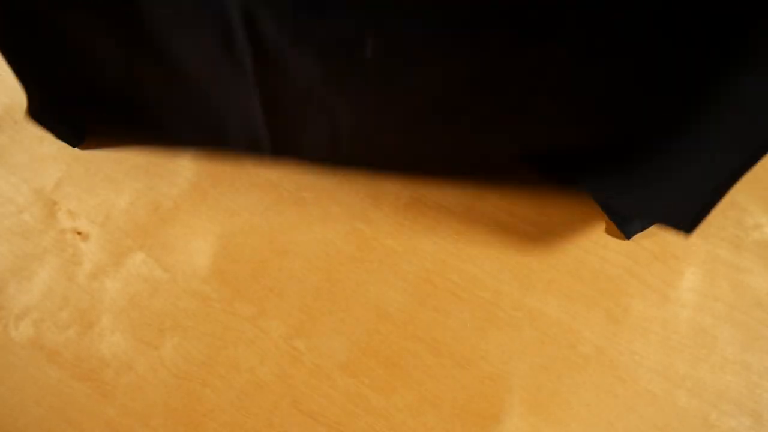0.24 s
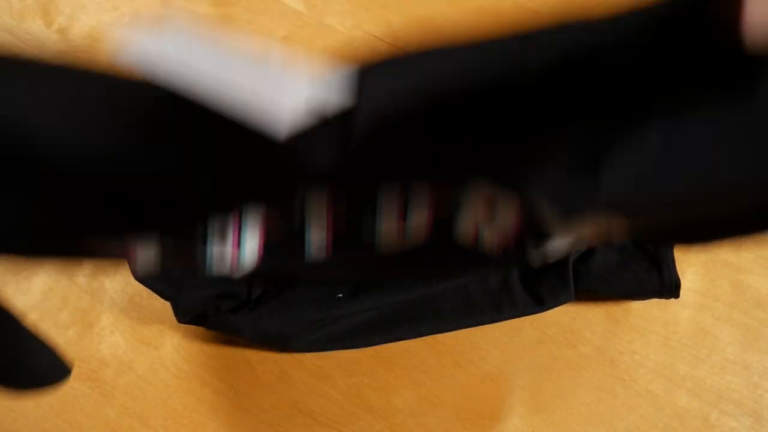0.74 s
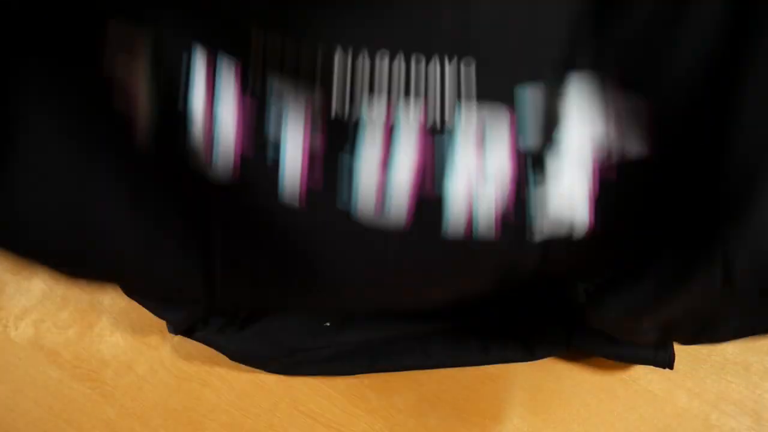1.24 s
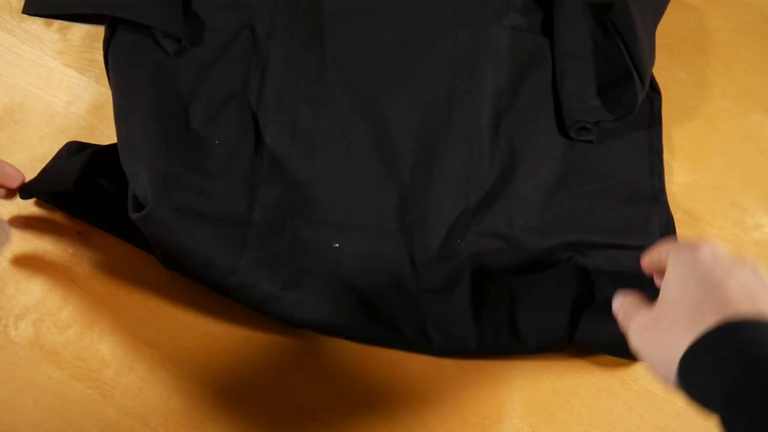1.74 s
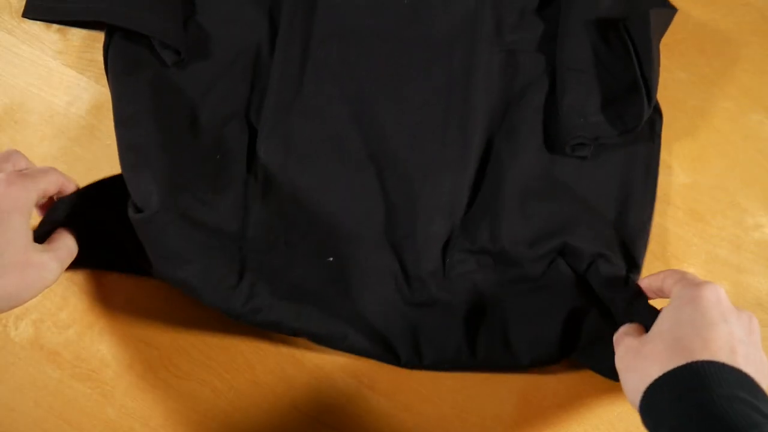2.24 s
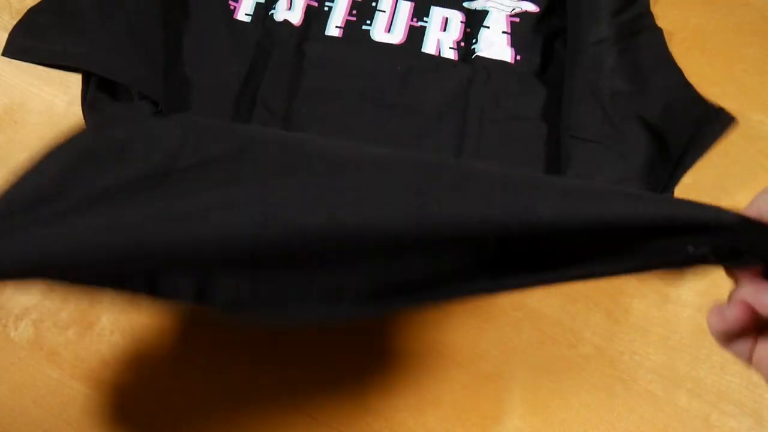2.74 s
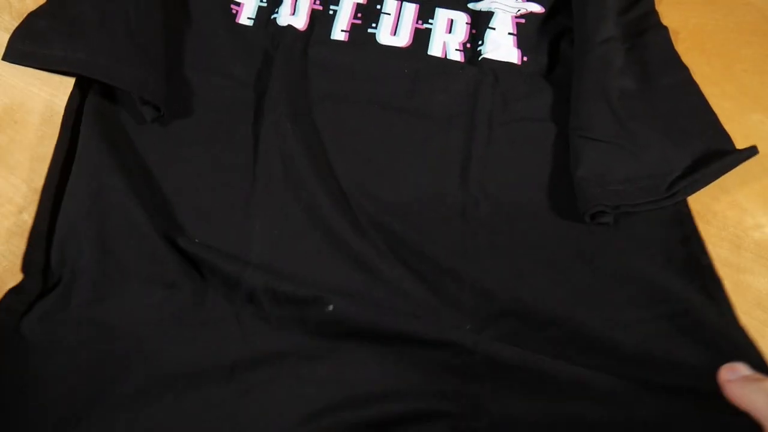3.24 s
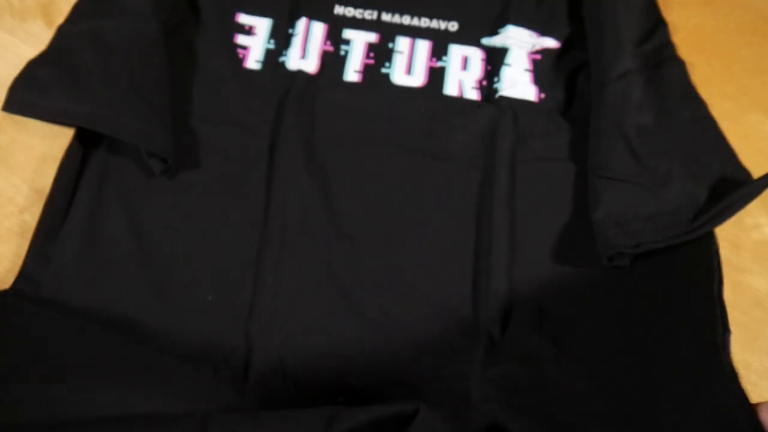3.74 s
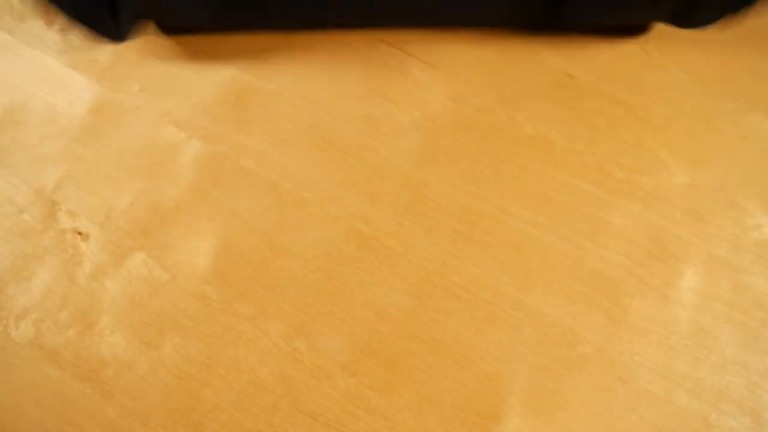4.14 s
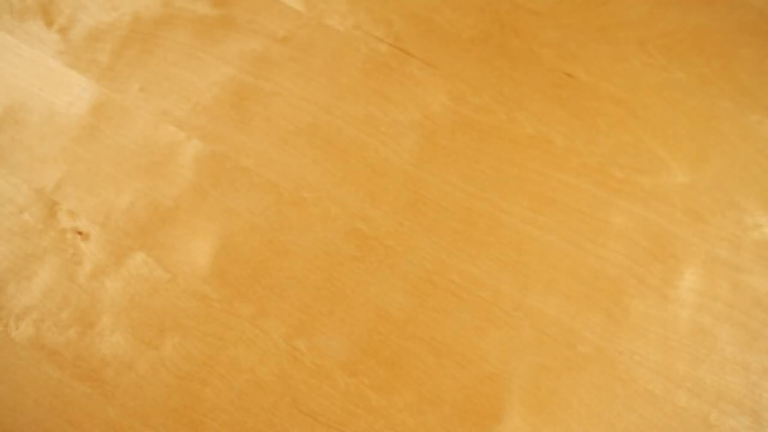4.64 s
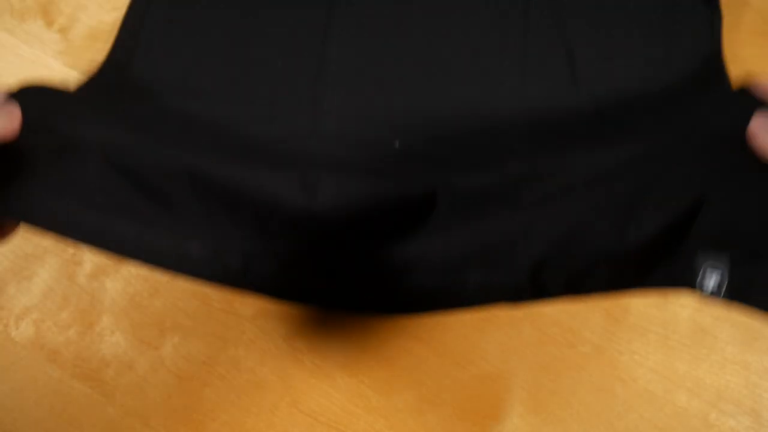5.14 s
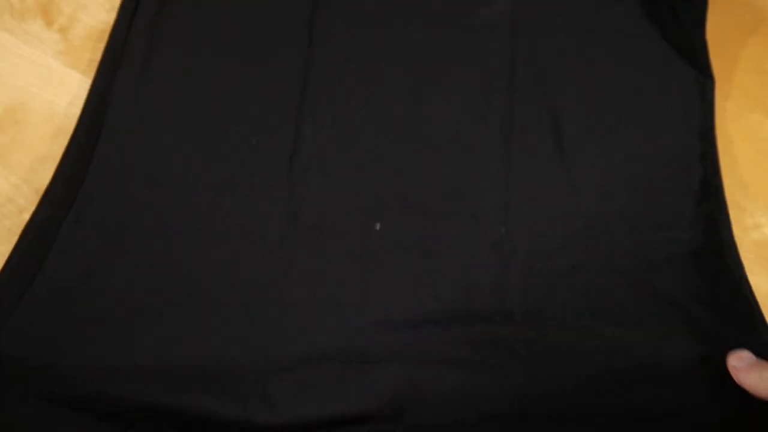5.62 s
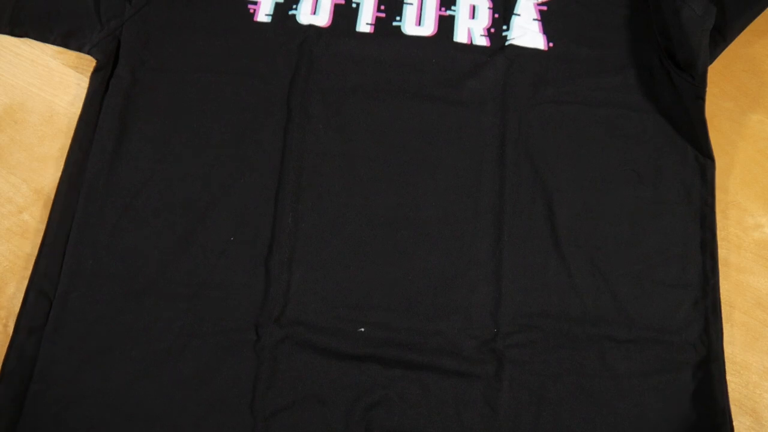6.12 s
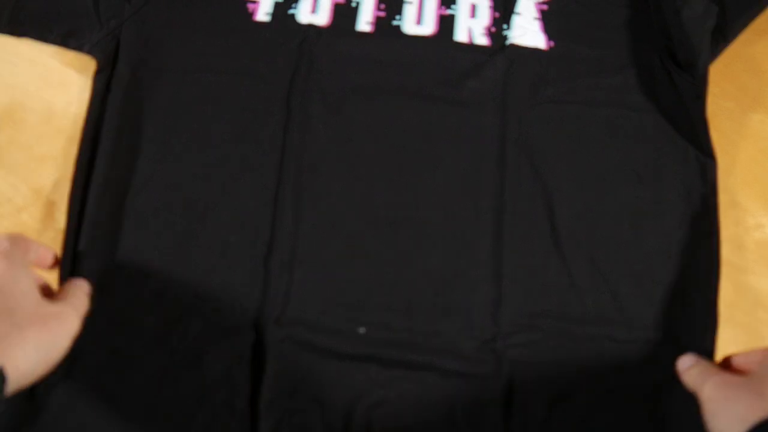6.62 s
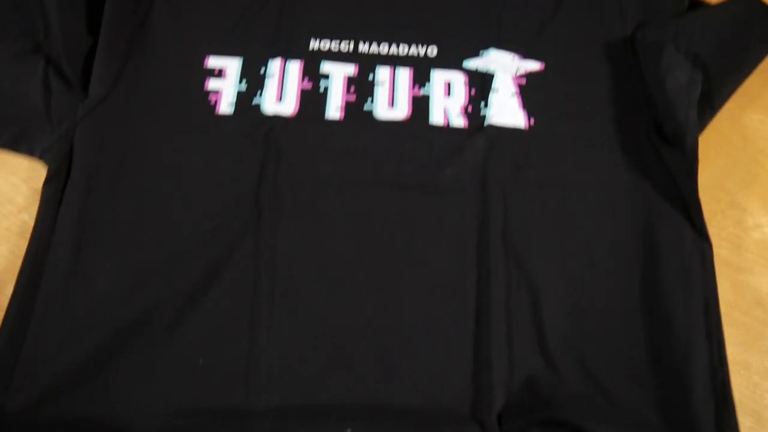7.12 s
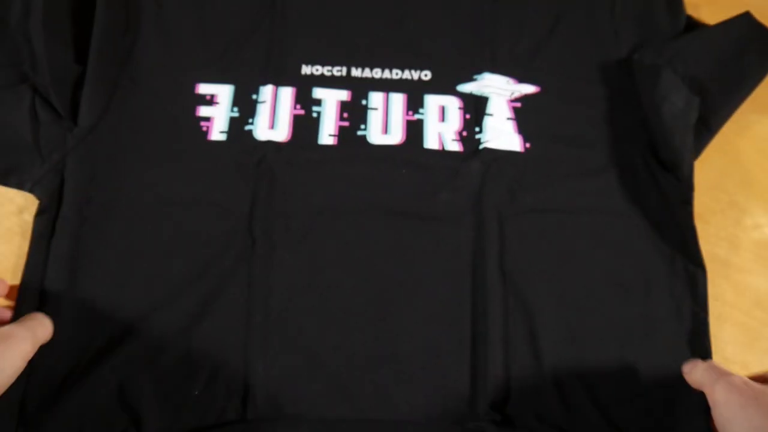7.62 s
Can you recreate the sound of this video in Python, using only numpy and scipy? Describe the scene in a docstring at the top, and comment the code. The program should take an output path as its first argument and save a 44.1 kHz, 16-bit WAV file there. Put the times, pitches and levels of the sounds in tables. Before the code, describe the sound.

Quiet fabric rustling on a wooden table, heard very close in mono-like sound. One sharp knock with a snap comes first, then fuller cloth strokes. Around the middle the cloth scrapes and pushes the microphone, with thuds and small hard clacks. Afterwards the shirt glides in smooth hisses, with a few soft knocks, and settles to faint rustling over low room noise.

```python
"""Cotton rustles and swishes, then hisses over wood three times among knocks, clicks and soft low bumps.
A shirt is shaken out, laid on a wooden table in a small room and pulled across it, close to one microphone.
Cloth sounds are filtered noise in bunched grains; knocks and clicks are noise bursts that ring damped modes.
Hands knock the table; cloth brushes the microphone, where something small and hard clicks and clacks.
Under it lie the room's rumble, a faint hiss and a low hum that comes and goes."""
import sys
import numpy as np
from scipy import signal
from scipy.fft import rfft, irfft, next_fast_len
from scipy.io import wavfile
from scipy.ndimage import map_coordinates

SR = 44100
rng = np.random.default_rng(int(sys.argv[2]) if len(sys.argv) > 2 else 0)


def generate_wav(signal):
    """Clip the signal to [-1, 1] and save it as 16-bit WAV at the path in sys.argv[1]."""
    frames = np.transpose(np.atleast_2d(signal))
    scaled = np.clip(frames, -1, 1) * 32767
    pcm = np.round(scaled).astype(np.int16)
    wavfile.write(sys.argv[1], SR, pcm)


N = 347067  # length in samples

# how hard the folds rub on each other: time_s, level_db
RUBBING = [(0, -69.5), (.2, -65), (.45, -62), (1.15, -62.5), (1.52, -64.5), (1.75, -51), (1.97, -68),
           (2.38, -57.5), (2.8, -56.5), (2.95, -61.5), (3.75, -61.5), (4.25, -52), (4.45, -67.5),
           (5.0, -52), (5.4, -62.5), (6.4, -70), (6.75, -66), (7.87, -65)]
# brisk strokes of cloth on cloth: centre_s, level_db, half_length_s
STROKES = [(.418, -65, .023), (.825, -64, 0.032), (1.307, -57.5, .037), (2.45, -63, 0.21),
           (3.12, -57, 0.056), (3.418, -49, 0.027), (3.617, -64, 0.13), (3.877, -48.5, .032),
           (3.948, -53, 0.037), (4.135, -53, .034), (7.525, -67, .018), (7.796, -63.5, .025)]
# colour of cotton folds: freq_hz, relative_db
COTTON = [(150, -22.5), (250, 3.5), (413, -9), (593, -3), (1330, -5), (1510, -6), (3570, -7), (4550, -10),
          (5500, -8.5), (13000, -21), (15500, -25.5)]
# brighter colour of the brisk strokes: freq_hz, relative_db
BRUSH = [(880, -41), (1500, -0.5), (2400, -7), (2720, -6.5), (3720, 1), (4570, -6), (5400, -0.5),
         (15500, -14.5)]
STROKE_FOLDS_DB = -3  # folds shift along with each brisk stroke


def rustle():
    """Folds rub on each other; brisk strokes swell into a brighter brushing."""
    strokes = swells(STROKES) * amp(0.87 * wobble(40))
    rubbing = amp(curves(RUBBING)[0] + 1.5 * wobble(25))
    fold_gain = np.hypot(rubbing, amp(STROKE_FOLDS_DB) * strokes)
    folds = fold_gain * friction(COTTON, grain_db=1.5, rate=400)
    brushing = strokes * friction(BRUSH, grain_db=1.5, rate=810)
    return folds + brushing


# the shirt dragged over the wood: start_s, end_s, mid_pull_db,
# swell_db (middle over ends; negative is a dip), loss_db (start to end; negative is a gain)
PULLS = [(5.131, 5.286, -54.5, -2.5, -1.5), (5.586, 6.082, -51.5, 4, 5.5),
         (6.872, 7.275, -47.5, 10.5, -7.5)]
# colour of the glide, one list for each pull: freq_hz, relative_db
GLIDE_COLOURS = [
    [(1470, -44), (2500, -26), (4360, -10), (6020, 3.5), (14000, -7.5), (15400, -18.5), (15800, -28.5)],
    [(1470, -39), (2500, -9), (3030, -20), (3940, -7), (4320, -12.5), (6510, 2.5), (7590, -4.5),
     (10800, -3), (12600, -11.5), (13600, -16.5), (15100, -11.5), (15800, -20)],
    [(760, -45), (1300, -17), (1520, -5), (1710, -21), (2490, -12.5), (3130, -26), (3850, -8),
     (4370, -11.5), (6300, 0.5), (7520, -8), (9770, -7.5), (13400, -13.5), (14800, -9), (15800, -18.5)],
]
PULL_ATTACK_DB_PER_S, PULL_RELEASE_DB_PER_S = 478, 380
PULL_FOLDS_DB = -9.5  # folds shift along with each pull, relative to the glide


def pulls():
    """The shirt glides over smooth wood with a high hiss whose level bends within each pull."""
    track, t = np.zeros(N), np.arange(N) / SR
    folds = amp(PULL_FOLDS_DB) * friction(COTTON, grain_db=0.5, rate=330)
    for (start, end, db, swell_db, loss_db), colour in zip(PULLS, GLIDE_COLOURS):
        way = np.clip((t - start) / (end - start), 0, 1) - .5  # -0.5 at the start, 0.5 at the end
        level_db = db - swell_db * (2 * way) ** 2 - loss_db * way + 1.0 * wobble(12)
        glide = friction(colour, grain_db=2.0, rate=780)
        envelope = amp(level_db) * gate(start, end, PULL_ATTACK_DB_PER_S, PULL_RELEASE_DB_PER_S)
        track += envelope * (glide + folds)
    return track


# blows on the table: time_s, first_10_ms_db, bass_db, cutoff_hz (low for a soft contact)
KNOCKS = [(.229, -47.5, 3, 750), (.488, -51, 9, 1500), (1.562, -45, 3, 1700), (1.612, -48, 10, 1200),
          (1.661, -38, 1.5, 1200), (1.671, -18.5, -3, 8000), (1.75, -30.5, -9.5, 3810),
          (1.876, -49, 2, 3460), (2.177, -30, 10, 2600), (3.941, -48, -8, 2520), (4.082, -49.5, -1, 1300),
          (4.228, -35, 5.5, 2200), (4.557, -46, 1.5, 1500), (4.751, -31.5, 5, 2510),
          (4.908, -37, -11.5, 6000), (4.916, -29.5, -4, 6500), (4.976, -36, -2, 2480), (5.02, -40, 5, 2970),
          (6.194, -42, 15, 2800), (6.227, -35, 5.5, 2440), (6.491, -41, -1, 2020), (6.589, -47, 10, 2200),
          (6.731, -58, -.5, 1200), (7.504, -51, -7, 800), (7.53, -55, -9, 816)]
# how fast a blow settles: blow_db, loss_per_contact_db
SETTLE_LOSS = [(-45, 12.5), (-32.5, 7), (-17, 18.5)]
SETTLE_S, SETTLE_DULLING = .018, 0.78  # spacing of contacts; each cutoff as a share of the one before


def knocks(count=3):
    """Each blow lands and settles in ever weaker, duller contacts."""
    track = np.zeros(N)
    for s, db, bass_db, cut_hz in KNOCKS:
        loss_db = np.interp(db, *np.transpose(SETTLE_LOSS))
        for k in range(count):
            contact = knock(db - k * loss_db, bass_db, cut_hz * SETTLE_DULLING ** k)
            add(track, s + k * SETTLE_S, contact)
    return track


# ringing modes of the table top: freq_hz, relative_db, t60_s
TABLE_MODES = [(157, -11.5, 0.8), (220.5, -11, 0.35), (297.5, 2.5, 0.27), (339, -0.5, 0.15), (536, -19, .2),
               (602, -3.5, 0.25), (655, -7, 0.17), (1060, -10.5, .16), (1178, -2, 0.082), (1510, -4, 0.16),
               (1612, -4.5, .15), (2000, -12, 0.15), (2460, -6.5, .12)]
# colour of the thud: freq_hz, relative_db
THUD = [(60, -17.5), (150, 0.5), (320, 0.5), (700, -4.5), (1000, -7.5), (1700, -7.5), (2800, -11),
        (5000, -8.5), (9000, -23.5), (16000, -30)]


def knock(db, bass_db, cut_hz):
    """A short thud that rings the table top; flesh and cloth make it duller, slower and longer."""
    t = np.arange(SR // 2) / SR
    contact_t60 = 0.026 * (8000 / cut_hz) ** .5
    rise = 1 - np.exp(-t * cut_hz / 5)
    thud = shaped(rng.standard_normal(len(t)) * amp(-60 * t / contact_t60) * rise, THUD)
    ring_db = -7.5 + 0.34 * (db + 32)  # harder blows ring more
    blow = unit(thud) + amp(ring_db) * unit(ring(TABLE_MODES, t) * rise)

    def softness(hz):
        bass = amp(along([(170, bass_db), (420, 0.011)], hz))
        return bass / (1 + (hz / cut_hz) ** 2) ** 0.85

    return in_room(amp(db) * struck(coloured(blow, softness)), wet_db=-6.5)


# hard contacts beside the microphone: time_s, first_10_ms_db, brightness_db_per_octave
CLICKS = [(1.671, -21, 9.5), (1.7885, -30.5, 2.5), (1.796, -35, 3), (1.8382, -46.5, .5), (4.2, -37.5, 4.5),
          (4.229, -33, 3), (4.357, -40, 0), (4.361, -41.5, 6), (4.492, -43.5, 4.5), (4.623, -42, 1),
          (4.66, -49, -3.5), (4.68, -41.5, -3.5), (4.73, -40.5, -2), (4.75, -21, -9.5), (4.753, -16.5, 0.5),
          (4.761, -18, 3.5), (4.775, -27.5, 2.5), (4.826, -37, 3), (4.897, -36, -1.5), (4.916, -25, -3),
          (4.931, -31.5, 3.5), (4.973, -30, 6)]
# colour of the snap: freq_hz, relative_db
SNAP = [(200, -23), (800, -20.5), (1050, -2), (3500, 8.5), (6500, 0.5), (11000, -10.5), (13500, -13),
        (16000, -21)]
# ringing modes of the small hard part: freq_hz, relative_db, t60_s
HARD_PART_MODES = [(1030, -1, 0.029), (1206, -0.5, 0.039), (1480, -3.5, .04), (1758, 3, 0.014),
                   (2290, -1.5, 0.026), (3200, -3.5, 0.023), (3720, -3, 0.033), (3560, 0.5, 0.037),
                   (3800, -2, 0.0092), (5820, 3.5, .015), (6200, -5.5, 0.0075)]


def clicks():
    """A sharp snap and the brief ring of a small hard part; hard hits rouse the room."""
    track, t = np.zeros(N), np.arange(SR // 2) / SR
    for s, db, bright_db in CLICKS:
        # the surfaces graze for two milliseconds, then snap home as the grazing fades
        graze = .055 * rng.standard_normal(len(t)) * amp(-60 * np.abs(t - .002) / .014)
        contact = graze + (np.arange(len(t)) == SR // 500)
        snap = unit(shaped(contact, SNAP))
        ringing = unit(signal.fftconvolve(contact, ring(HARD_PART_MODES, t))[:len(t)])
        click = snap + amp(-2.5) * ringing
        click = coloured(click, lambda hz: amp(bright_db * np.log2(np.clip(hz, 1000, 10000) / 3000)))
        wet_db = np.interp(db, [-30, -12], [-12, -6])
        add(track, s - .002, in_room(amp(db) * struck(click), wet_db))
    return track


# soft pushes on the microphone: centre_s, level_db, pitch_hz
BUMPS = [(4.243, -25, 45), (4.262, -19, 58.6), (4.47, -23, 34.7), (4.479, -34, 83), (4.538, -18, 42),
         (4.562, -25.5, 96), (4.664, -34, 60), (4.699, -29, 31)]
# cloth catching on the microphone: time_s, level_db
SCRAPES = [(4.207, -39), (4.233, -26.5), (4.278, -30)]
# colour of the rasp: freq_hz, relative_db
GRIT = [(410, -37), (700, -39), (851, -15), (933, -22), (1360, -14), (2790, -15.5), (5490, 1.5),
        (6680, -11), (14100, -20.5), (15800, -27.5)]
# wafts of air from the swung shirt: centre_s, level_db, half_length_s
WAFTS = [(.4, -55, 0.39), (1.95, -47, 0.38), (3.57, -40, 0.16), (4.7, -41.5, 0.41), (7.6, -58, .13)]
# colour of moving air at the microphone: freq_hz, relative_db
AIR = [(10, 0), (17, 7.5), (28, 2), (42, -4.5), (55, -10), (80, -16), (130, -27), (260, -61)]
SCRAPE_ATTACK_DB_PER_S, SCRAPE_RELEASE_DB_PER_S = 1100, 853.5
DRAUGHT_DB = -48.5  # air that never settles


def handling():
    """Cloth rasps over the microphone, pushes on it and fans air at it."""
    track, t = np.zeros(N), np.arange(-SR // 10, SR // 10) / SR
    for s, db, hz in BUMPS:
        push = np.exp(-(t * hz / 0.45) ** 2) * np.sin(2 * np.pi * hz * t)
        add(track, s + t[0], amp(db) * push)
    catches = sum(amp(db) * gate(s, s, SCRAPE_ATTACK_DB_PER_S, SCRAPE_RELEASE_DB_PER_S)
                  for s, db in SCRAPES)
    rasp = catches * friction(GRIT, grain_db=4.0, rate=450)
    air = (amp(DRAUGHT_DB) + swells(WAFTS)) * friction(AIR, grain_db=2, rate=6)
    return track + rasp + air


# faint squeaks under the fingers: centre_s, level_db, pitch_hz
SQUEAKS = [(.982, -54, 1910), (6.872, -63, 2670)]
SQUEAK_HALF_S, SQUEAK_WIDTH_HZ = .006, 200


def squeaks():
    """Stick and slip gives a short, rough tone: noise in a narrow band."""
    track = np.zeros(N)
    for s, db, pitch_hz in SQUEAKS:
        band = lambda hz: 1 / (1 + ((hz - pitch_hz) / SQUEAK_WIDTH_HZ) ** 2)
        tone = unit(coloured(rng.standard_normal(N), band))
        track += swells([(s, db, SQUEAK_HALF_S)]) * tone
    return track


# low room noise, played 3 dB above these levels: time_s, level_db
ROOM_LEVEL = [(0, -57.5), (1.25, -53.5), (4.95, -61), (5.3, -61), (6.1, -59.5), (6.6, -57), (7.87, -60.5)]
# colour of the room noise: freq_hz, relative_db
ROOM_TONE = [(35, -31), (60, -18.5), (100, -4.5), (150, -2.5), (175, -9.5), (205, 2.5), (243, -9),
             (290, -16), (388, -18.5), (600, -23.5), (900, -29.5), (1500, -33), (4000, -54.5)]
# the passing hum: time_s, level_db
HUM_LEVEL = [(1.65, -72), (1.88, -55.5), (3.06, -50.5), (3.15, -63)]


def background():
    """Low room noise, a faint even hiss and a passing hum of slightly wavering pitch."""
    room = amp(curves(ROOM_LEVEL)[0] + 3) * friction(ROOM_TONE, grain_db=2, rate=8)
    pitch_hz = 86.1 + .1 * wobble(4.7)
    hum = unit(np.sin(2 * np.pi * np.cumsum(pitch_hz) / SR))
    return room + amp(-72.0) * hiss() + amp(curves(HUM_LEVEL)[0]) * hum


# colour of the electronic hiss: freq_hz, relative_db
HISS = [(300, -3.5), (1500, -7.5), (5500, -7.5), (9000, -8.5), (15800, -8)]


def hiss():
    """Even electronic noise of rms 1."""
    return unit(shaped(rng.standard_normal(N), HISS))


# how long the small room rings: freq_hz, t60_s
WALLS = [(100, 0.17), (400, 0.21), (1500, 0.28), (5000, 0.29), (14000, 0.18)]


def in_room(x, wet_db):
    """A sound followed by a blurred answer, noise that decays at its own rate in each band."""
    hz, t, z = signal.stft(rng.standard_normal(len(x)), SR, nperseg=256)
    decay = amp(-60 * t / along(WALLS, hz)[:, None])
    build_up = 1 - np.exp(-t / 0.0013)
    tail = signal.istft(z * decay * build_up, SR, nperseg=256)[1]
    return x + amp(wet_db) * signal.fftconvolve(x, tail / np.linalg.norm(tail))[:len(x)]


def friction(spectrum, grain_db, rate):
    """Countless fibre slips, bunched by a random curve of rate knots a second; rms 1."""
    grains = rng.standard_normal(N) * amp(grain_db * wobble(rate))
    return unit(shaped(grains, spectrum))


def ring(modes, t):
    """Damped modes, struck at slightly new strengths and random signs each time."""
    strengths = amp(rng.normal(0, 2, len(modes))) * rng.choice([-1, 1], len(modes))
    return sum(strength * amp(db - 60 * t / t60) * np.sin(2 * np.pi * hz * t)
               for strength, (hz, db, t60) in zip(strengths, modes))


def struck(x):
    """A blow scaled to rms 1 over its first 10 ms."""
    return x / np.sqrt(np.mean(x[:SR // 100] ** 2))


def swells(rows):
    """Gain per sample of smooth swells, each a row (centre_s, level_db, half_length_s)."""
    t = np.arange(N) / SR
    return sum(amp(db) * np.exp(-.5 * ((t - s) / half) ** 2) for s, db, half in rows)


def gate(start, end, attack, release):
    """Gain per sample: rises up to start, holds, falls after end; slopes in dB a second."""
    t = np.arange(N) / SR
    return amp(-attack * np.maximum(start - t, 0) - release * np.maximum(t - end, 0))


def amp(db):
    """Decibels to gain."""
    return 10 ** (np.asarray(db) / 20)


def unit(x):
    """x at rms 1."""
    return x / np.sqrt(np.mean(x ** 2) + 1e-20)


def along(points, hz):
    """(Hz, value) points read on a log frequency axis."""
    f, v = np.transpose(points)
    return np.interp(np.log(hz + 1), np.log(f + 1), v)


def curves(rows):
    """One value per sample for each column after the time; -120 outside the rows."""
    s, *cols = np.transpose(rows)
    return [np.interp(np.arange(N) / SR, s, c, left=-120, right=-120) for c in cols]


def wobble(rate):
    """A smooth random curve, rate knots a second."""
    knots = rng.standard_normal(int(N * rate / SR) + 4)
    return map_coordinates(knots, [np.arange(N) * rate / SR])


def coloured(x, gain):
    """x through a causal minimum-phase filter whose gain is a function of frequency."""
    m = 2 * next_fast_len(len(x) // 2 + 4096)
    cepstrum = irfft(np.log(np.maximum(gain(np.fft.rfftfreq(m, 1 / SR)), 1e-6)))
    # folding the cepstrum onto positive time makes the filter causal
    cepstrum[1:m // 2] *= 2
    cepstrum[m // 2 + 1:] = 0
    return irfft(rfft(x, m) * np.exp(rfft(cepstrum)))[:len(x)]


def shaped(x, spectrum):
    """x with the given (Hz, dB) colour."""
    return coloured(x, lambda hz: amp(along(spectrum, hz)))


def add(track, s, x):
    """Mix x into the track at time s."""
    start = max(round(s * SR), 0)
    track[start:start + len(x)] += x[:max(N - start, 0)]


def scene():
    """One close microphone feeds both channels; a very faint noise and a faint blurred copy differ."""
    mono = rustle() + pulls() + knocks() + clicks() + handling() + squeaks() + background()
    blurred_copy = in_room(mono, wet_db=-33) - mono
    side = amp(-71.5) * hiss() + blurred_copy  # opposite in sign between the channels
    return np.array([mono + side, mono - side])


TOP_HZ = 15850  # band limit


def record(dry):
    """The recorder clips at full scale and keeps nothing above its band limit."""
    m = next_fast_len(N + SR // 2)
    spectrum = rfft(np.clip(dry, -1, 1), m)
    in_band = np.fft.rfftfreq(m, 1 / SR) < TOP_HZ
    return irfft(spectrum * in_band, m)[:, :N]


dry = scene()
out = record(dry)
generate_wav(out)
```